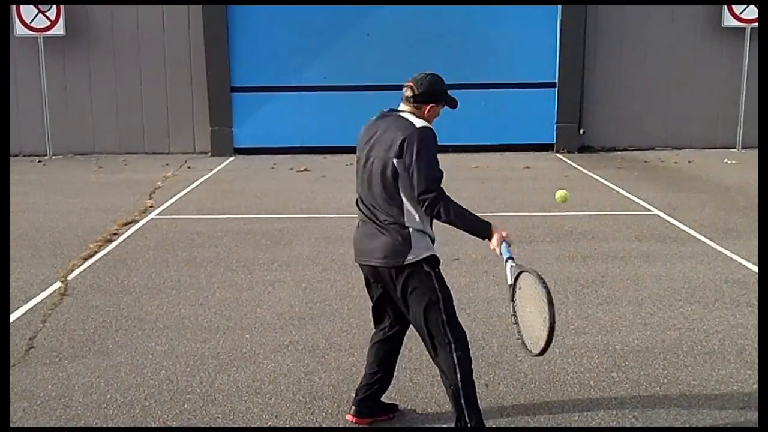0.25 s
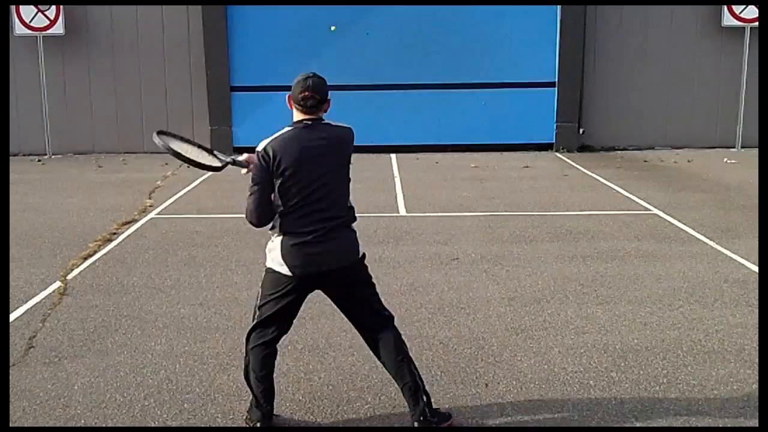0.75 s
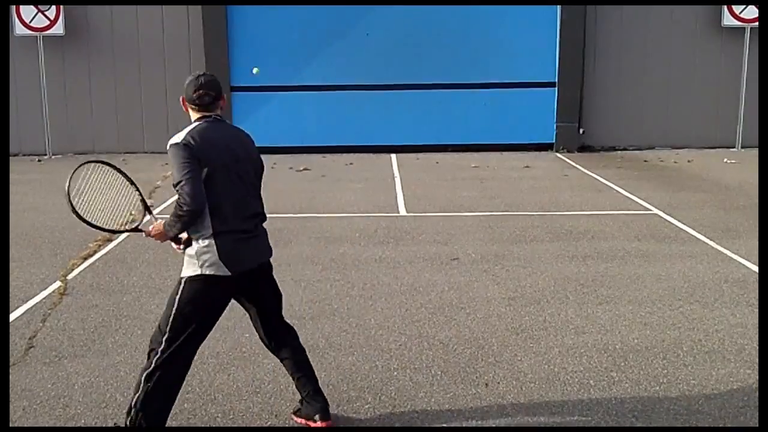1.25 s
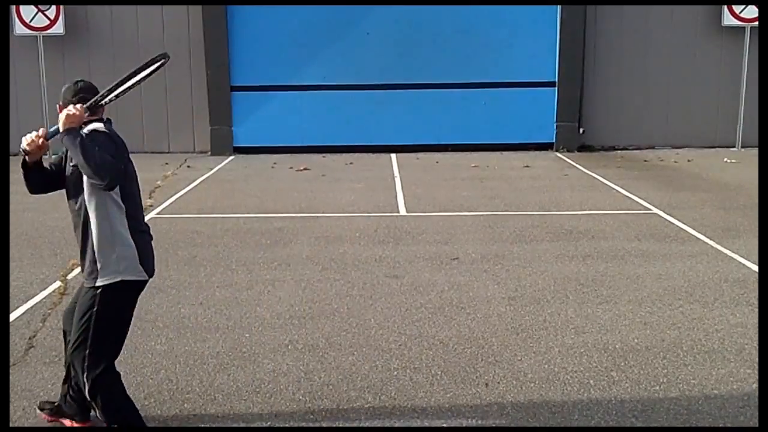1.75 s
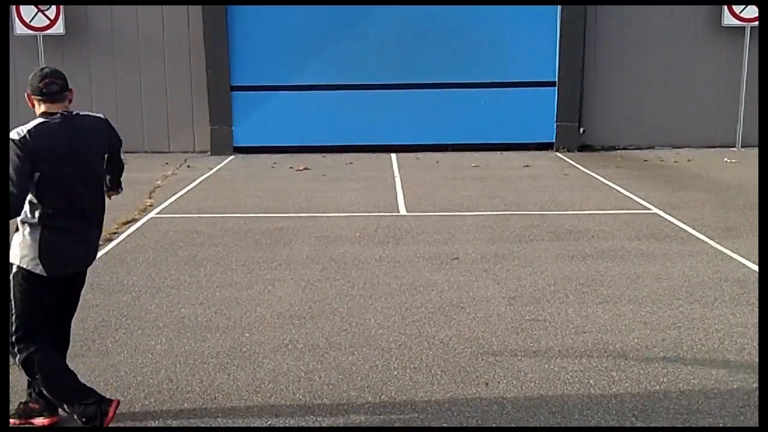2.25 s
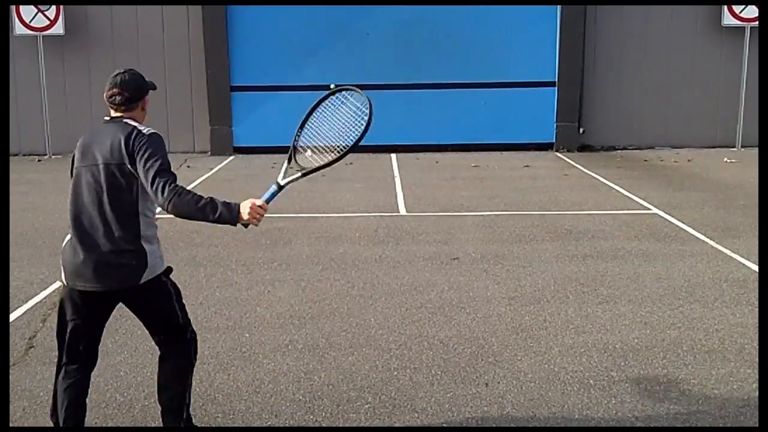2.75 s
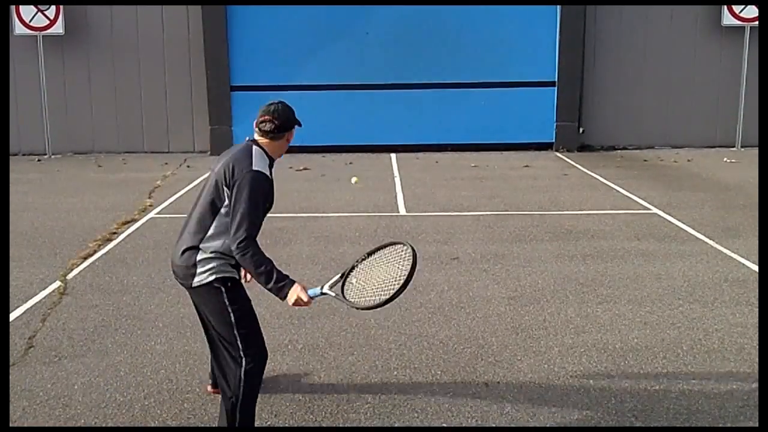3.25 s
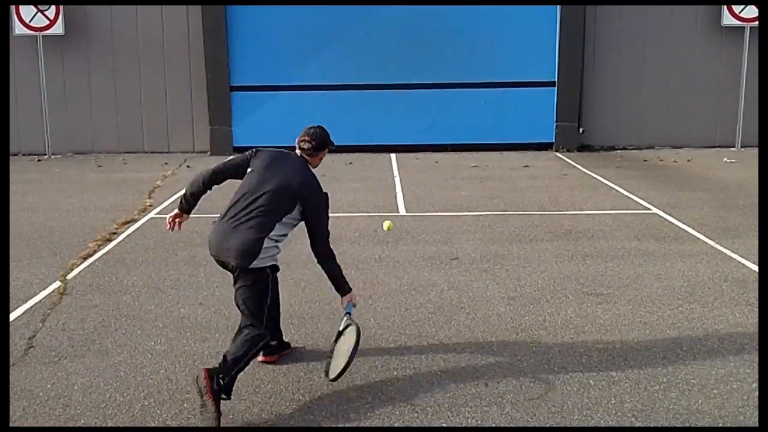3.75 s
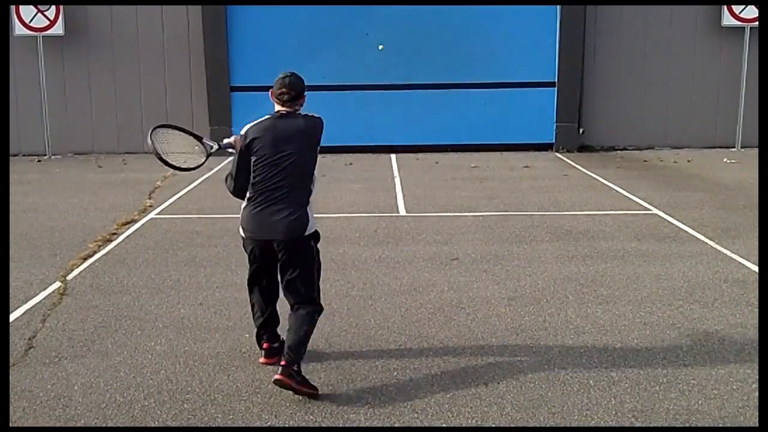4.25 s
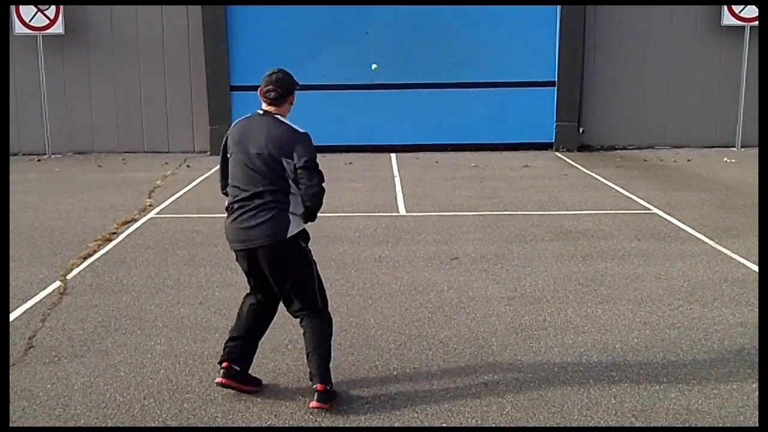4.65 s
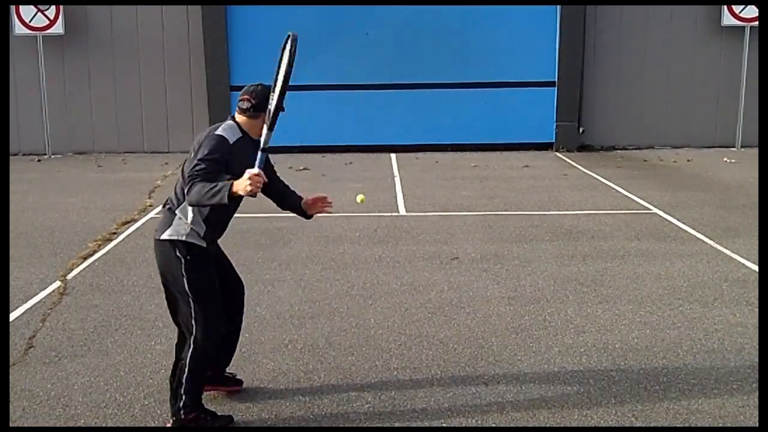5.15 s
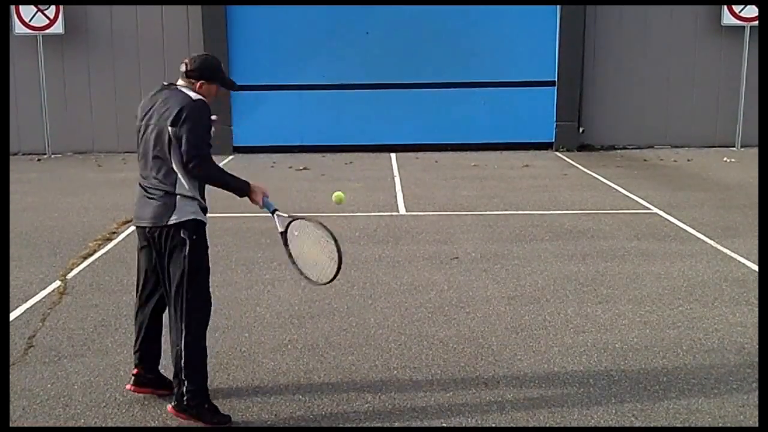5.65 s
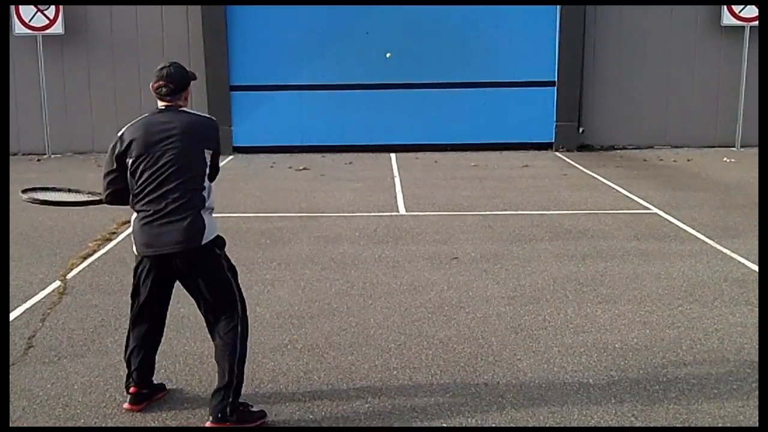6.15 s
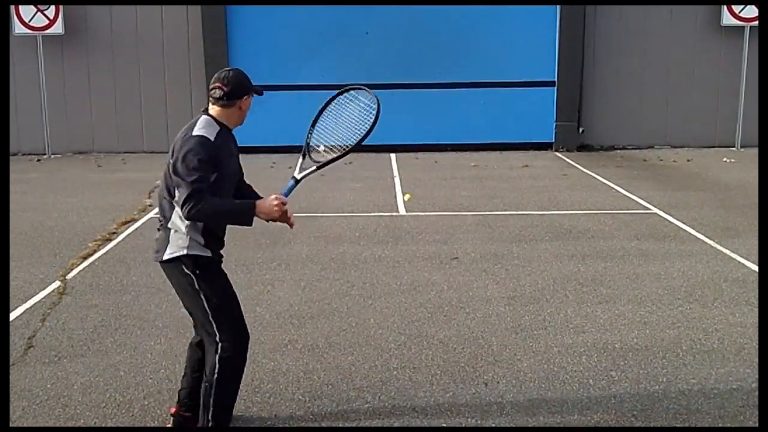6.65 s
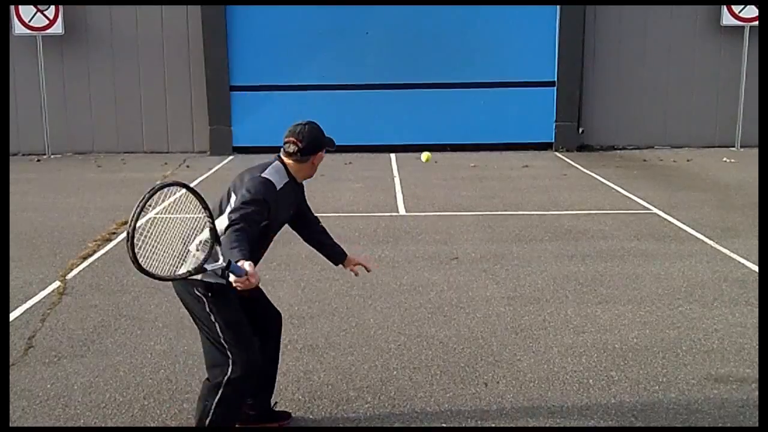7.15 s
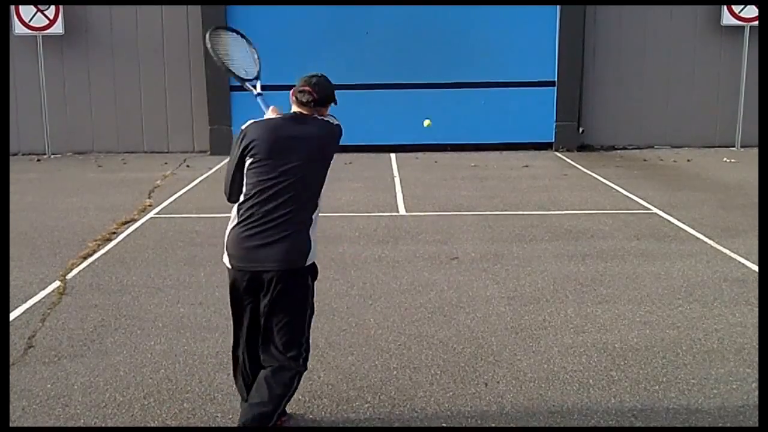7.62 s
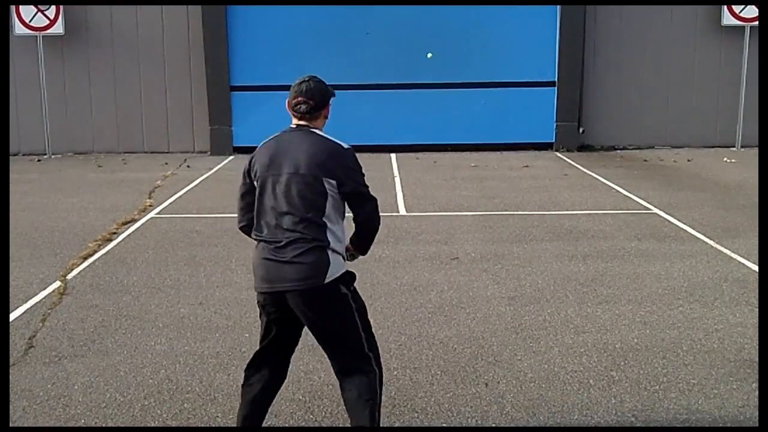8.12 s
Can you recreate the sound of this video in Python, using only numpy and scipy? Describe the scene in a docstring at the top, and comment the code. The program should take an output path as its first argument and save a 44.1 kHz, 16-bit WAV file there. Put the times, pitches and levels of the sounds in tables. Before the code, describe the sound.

A solo tennis rally against a practice wall on an open asphalt court, heard near the player. A rough, crackling wind buffet hits the microphone at 0.1-0.25 s. A soft racket pop at 0.5 brings a modest wall crack at 1.0 amid another gust, then a faint bounce at 1.8. A brighter stroke at 2.4 is answered by a loud crack and boom at 2.9, with wind thumping at 3.05 and a bounce at 3.35. Shoes tap and a sole drags gritty asphalt at 3.75-3.95 before a higher-pitched pop at 4.05; the wall cracks at 4.5. Footsteps cluster at 4.8, and a clear bounce comes at 5.2. Strong ringing pop at 5.9, loudest crack at 6.3, shoe knock at 6.75, bounce at 6.9. The last stroke at 7.7 precedes a sharp scuffing footfall at 8.0 and a final crack at 8.15, echoing away.

```python
"""A tennis racket rallies a ball against a practice wall on an outdoor asphalt court: noise slap, ringing pop.
The wall cracks, booms and rings in damped modes; the ball bounces back in short decaying tones.
Shoes knock in filtered pulses; random grains make scrapes; decaying noise echoes round the walls.
Gusts of coloured noise and single eddies buffet the microphone over faint outdoor noise."""
import sys
import numpy as np
from scipy import signal
from scipy.fft import rfft, irfft, next_fast_len
from scipy.io import wavfile
from scipy.ndimage import uniform_filter1d, map_coordinates

SR = 44100
rng = np.random.default_rng(int(sys.argv[2]) if len(sys.argv) > 2 else 0)


def master_out(mix):
    """Clip the mix to full scale and print it as 16-bit PCM to the path in sys.argv[1]."""
    frames = np.transpose(np.atleast_2d(mix))
    ceiling = np.clip(frames, -1, 1)
    pcm = np.round(ceiling * 32767).astype(np.int16)
    wavfile.write(sys.argv[1], SR, pcm)


N = 369773

# Event levels are relative: each layer adds its own offset in dB. Modal pitches vary slightly per blow.
# Racket strokes. Each row: start in seconds, slap level in dB, ball pop level in dB, pop pitch in Hz,
# frame thud level in dB, thud pitch in Hz, string level in dB, near-wall echo delay in seconds.
RACKET_STROKES = [(0.518, -27.5, -29.5, 890, -24.5, 416, -32, 0.059),
                  (2.43, -21, -22.5, 908, -24.5, 390, -25.5, 0.06),
                  (4.053, -19.5, -21, 1522, -17.5, 297, -26.5, 0.056),
                  (5.8849, -17, -14, 890, -24, 378, -25.5, .062),
                  (7.691, -18, -16, 880, -31.5, 300, -23.5, 0.061)]
# Ball on the wall. Each row: start in seconds, crack level in dB, panel level in dB.
WALL_BLOWS = [(1.0368, -17.5, -31.5), (2.8982, -5.5, -23), (4.521, -7, -25.5), (6.3277, -2.5, -22),
              (8.1573, -4, -22.5)]
# Ball on the asphalt. Each row: start in seconds, level in dB, pitch in Hz.
GROUND_BOUNCES = [(1.7848, -27, 1400), (3.3552, -22, 1274), (5.2296, -16.5, 1250), (6.9241, -22.5, 1176)]
# Footfalls. Each row: start in seconds, heel level in dB, pitch in Hz,
# loss per further contact in dB (negative: gain), grit level in dB.
FOOTFALLS = [(0.7805, -35, 1740, 14, -51), (.8335, -35.5, 2700, 12, -52), (1.946, -41, 2450, 14, -58),
             (2.043, -43, 2960, 12, -54), (2.1372, -25.5, 1500, 19, -65), (2.5765, -15, 1340, 22, -48),
             (3.5827, -29, 1600, 20, -59), (3.644, -23, 1570, 16, -48), (3.9564, -16.5, 2130, 6, -33),
             (4.778, -26.5, 2170, 4, -47), (4.7971, -16, 1570, 6, -46), (4.8277, -25, 2570, 25, -60),
             (5.1843, -21.5, 2280, 7, -29.5), (5.207, -23, 2500, 4.5, -29.5), (5.318, -32, 2040, 18, -45),
             (5.829, -36, 2250, -2, -41), (6.7622, -14.5, 1350, 42, -35.5),
             (7.558, -40.5, 2080, -2.5, -44.5), (7.9762, -11.5, 1840, 1.5, -21.5),
             (8.3176, -31, 1440, 11, -53)]
# Short bursts of scrape: soles sliding on grit, and strokes returned by the practice wall.
# Each row: middle in seconds, level in dB, quarter of the length in seconds.
SCRAPE_BURSTS = [(.687, -39, 0.02), (1.168, -39, .03), (3.195, -45, .011), (3.615, -47.5, 0.028),
                 (4.483, -38.5, 0.019), (5.266, -40.5, 0.043), (6.038, -39.5, .025), (6.738, -37.5, .022),
                 (7.265, -46, 0.023), (8.039, -42, 0.041)]
# Wind strength at the microphone. Each row: time in seconds, level in dB.
WIND_LEVEL = [(0, -40.5), (.1, -29.5), (.12, -11), (.185, -20), (.235, -12), (.255, -33.5), (.87, -31),
              (.95, -23), (1.05, -24.5), (1.32, -37.5), (1.4, -53), (1.61, -41.5), (1.72, -32), (1.94, -44),
              (2.16, -56.5), (2.35, -39), (2.86, -40.5), (3.05, -22), (3.49, -45), (3.61, -32.5),
              (3.85, -49.5), (4.08, -25), (4.36, -43), (4.5, -27), (4.9, -41), (5.02, -30), (5.6, -46.5),
              (5.8, -37.5), (6.13, -64), (6.7, -52), (7.01, -38), (7.2, -48), (7.54, -31), (7.84, -38.5),
              (7.91, -22.5), (8.12, -40), (8.38, -28.5)]
# Eddies striking the microphone. Each row: middle in seconds, level in dB, pitch in Hz.
WIND_EDDIES = [(.121, -5.5, 350), (.142, -12.5, 197), (.163, -11.5, 170), (.181, -15, 300),
               (.239, -9.5, 271), (0.9704, -12.5, 320), (0.975, -9.5, 136), (1.016, -16, 286),
               (1.752, -19.5, 109), (1.871, -22, 108), (2.013, -22, 99), (3.05, -9, 144),
               (3.076, -15.5, 242), (3.116, -20, 203), (3.138, -14.5, 165), (3.222, -22, 216),
               (4.167, -18.5, 144), (4.765, -14, 158), (4.822, -20, 128), (4.98, -17, 90), (6.82, -34, 100),
               (7.008, -23.5, 121), (7.32, -22.5, 101), (7.49, -22, 138), (7.666, -19, 132),
               (7.898, -17.5, 128)]
# Upper modes of squashed ball and frame. Each row: pitch in Hz, level in dB, T60 in seconds.
BALL_MODES = [(1150, 7, 0.03), (1787, -2, 0.085), (2130, -6.5, 0.082), (2820, -21.5, .025),
              (3830, -9, 0.061), (4600, -15, 0.014)]
# String bed modes. Each row: pitch in Hz, level in dB, T60 in seconds.
STRING_MODES = [(484, -1.5, 0.22), (628, -16, 0.69), (910, -11.5, 0.45), (1372, -2, 0.12),
                (1720, -2.5, 0.14), (2040, -12, 0.36), (2697, -6, 0.089), (4230, -26, 0.06)]
# Low modes of the wall panel. Each row: pitch in Hz, level in dB, T60 in seconds.
PANEL_LOW_MODES = [(120, -5, 0.25), (186, -5, 0.52), (244.5, 0, 0.2), (298, -0.5, 0.29), (464, -14, 0.45),
                   (489, -15, .3), (702, -2, 0.23), (874, 0, .2), (995, -3.5, 0.25), (1186, -5.5, 0.12),
                   (1570, -7, 0.091)]
# Spectrum of felt on strings and asphalt. Each row: frequency in Hz, relative density in dB per Hz.
SLAP_SPECTRUM = [(100, -13), (330, 4), (480, 1.5), (610, -2), (800, 5), (1100, 0.5), (1400, -2.5),
                 (2000, -2), (3000, -8.5), (4300, -11), (5500, -19), (8000, -30), (11000, -39.5),
                 (16000, -56)]
# Spectrum of the wall crack. Each row: frequency in Hz, relative density in dB per Hz.
CRACK_SPECTRUM = [(60, -20), (250, 9.5), (900, -2), (1800, 9.5), (3000, -1), (5000, -15.5), (8000, -32),
                  (16000, -33)]
# Spectrum of the panel's dense ringing. Each row: frequency in Hz, relative density in dB per Hz.
PANEL_SPECTRUM = [(40, -45), (100, 4.5), (230, 6.5), (380, -1.5), (700, -3), (1500, -5), (2400, -9.5),
                  (3500, -20.5), (5000, -25), (8000, -50), (16000, -52)]
# Decay of that ringing. Each row: frequency in Hz, T60 in seconds.
PANEL_DECAY = [(80, 1), (230, 0.56), (600, 0.53), (2000, 0.34), (5000, 0.16), (12000, 0.075)]
# Spectrum of the court's reverberation. Each row: frequency in Hz, relative density in dB per Hz.
COURT_SPECTRUM = [(80, -20), (250, 11), (500, 3), (900, 11.5), (1300, 3), (1520, 6.5), (1720, 9.5),
                  (2100, 4.5), (2700, 0), (4000, -11.5), (7000, -28), (16000, -44)]
# Decay of the court. Each row: frequency in Hz, T60 in seconds.
COURT_DECAY = [(100, 2), (1000, 0.97), (2500, 1.05), (5000, 1.05), (12000, .4)]
# Spectrum of the grainy scrapes. Each row: frequency in Hz, relative density in dB per Hz.
GRIT_SPECTRUM = [(150, -8.5), (600, 3.5), (1500, 7), (3000, -4), (6000, -9.5), (8000, -36), (16000, -39)]
# Spectrum of the dragged sole. Each row: frequency in Hz, relative density in dB per Hz.
SOLE_DRAG_SPECTRUM = [(200, -1), (600, 3.5), (1000, -0.5), (1900, 4), (3000, -6), (4500, -8.5),
                      (6500, -12.5), (8500, -26), (12000, -30), (16000, -34)]
# Spectrum of weak wind. Each row: frequency in Hz, relative density in dB per Hz.
WEAK_WIND_SPECTRUM = [(15, -24), (35, -3.5), (75, 1.5), (160, -6.5), (240, -13), (350, -25), (600, -39),
                      (1500, -67), (5000, -82)]
# Spectrum of strong wind. Each row: frequency in Hz, relative density in dB per Hz.
STRONG_WIND_SPECTRUM = [(20, -15), (90, -12.5), (170, -1), (290, -6.5), (450, -20), (700, -27), (1300, -55),
                        (4000, -81), (16000, -87)]
# Spectrum of distant outdoor noise. Each row: frequency in Hz, relative density in dB per Hz.
AIR_SPECTRUM = [(120, -32), (200, -10.5), (350, -8), (880, -9.5), (1650, -15), (2300, -20.5), (3800, -21.5),
                (4600, -31.5), (7000, -35.5), (8400, -37), (14000, -35.5), (16000, -41)]
# Level of distant outdoor noise: quieter at first, steady from 1.8 s.
# Each row: time in seconds, relative level in dB.
AIR_LEVEL = [(0, -7), (.9, -6), (1.8, 0)]

TIME_S = np.arange(N) / SR
AGE_S = np.arange(2 * SR) / SR  # time since a blow
TOP_HZ = 15900
WALL_ECHO_S, WALL_ECHO_DB = 0.13, -23  # racket sound back from the practice wall
# narrow ringing echo between the court walls after each stroke
FLUTTER_HZ, FLUTTER_S, FLUTTER_DB, FLUTTER_T60_S = 1840, 0.19, -47, 0.95
ROLL_S = 0.008  # between contacts of a landing sole
GRIT_QUARTER_S, GRIT_HZ = 0.012, 2370  # quarter length of a landing's crunch; centre of the scrape band
# a sole dragged through a lunge; it grips and slips in rasps RASP_S apart
DRAG_START_S, DRAG_END_S, DRAG_DB, DRAG_EDGE_DB_PER_S = 3.745, 3.96, -43.5, 450
RASP_S, RASP_DB = 0.085, 2
# eddies at OVERLOAD_DB or more crackle fully; weaker ones lose CRACKLE_SLOPE dB per dB
OVERLOAD_DB, CRACKLE_DB, CRACKLE_SLOPE = -11.5, -27, 6.3


def amp(db):
    """Decibels to gain."""
    return 10 ** (np.asarray(db) / 20)


def unit(x):
    """x at rms 1."""
    return x / np.sqrt(np.mean(x ** 2) + 1e-20)


def along(points, hz):
    """(Hz, value) points interpolated on a log-frequency axis."""
    point_hz, values = np.transpose(points)
    return np.interp(np.log(hz + 1), np.log(point_hz), values)


def fade(t_s, t60_s):
    """Exponential decay, 60 dB per T60."""
    return np.exp(-np.log(1000) * t_s / t60_s)


def add(track, start_s, sound):
    """Mix a sound into the track."""
    start = max(round(start_s * SR), 0)
    track[start:start + len(sound)] += sound[:max(N - start, 0)]


def noise(spectrum, size):
    """Coloured noise of rms 1."""
    fft_size = next_fast_len(size)
    hz = np.fft.rfftfreq(fft_size, 1 / SR)
    white = rfft(rng.standard_normal(fft_size))
    return unit(irfft(white * amp(along(spectrum, hz)), fft_size)[:size])


def click(spectrum, size=1024):
    """Causal minimum-phase pulse of peak 1 with this spectrum."""
    gain = amp(along(spectrum, np.fft.rfftfreq(size, 1 / SR)))
    cepstrum = irfft(np.log(gain))
    cepstrum[1:size // 2] *= 2
    cepstrum[size // 2 + 1:] = 0
    pulse = irfft(np.exp(rfft(cepstrum)))
    return pulse / np.abs(pulse).max()


def tail(spectrum, decay):
    """Dense ringing: noise of rms 1 before each frequency decays at its own T60."""
    hz, t_s, bins = signal.stft(noise(spectrum, len(AGE_S)), SR, nperseg=256)
    t60_s = along(decay, hz)[:, None]
    return signal.istft(bins * fade(t_s, t60_s), SR)[1][:len(AGE_S)]


def ring(modes, swell_s, size=16384):
    """Damped modes with a soft onset; tuning and mode levels vary per blow."""
    t_s = AGE_S[:size]
    tuning = 1 + rng.normal(0, 0.005)
    waves = np.zeros(size)
    for hz, db, t60_s in modes:
        level = amp(db + rng.normal())
        waves += level * fade(t_s, t60_s) * np.sin(2 * np.pi * hz * tuning * t_s)
    onset = 1 - np.exp(-(t_s / swell_s) ** 2)
    return waves * onset * np.linspace(1, 0, size)


def band(x, hz, spread, order=2):
    """Band-pass centred on hz, edges a factor 1 + spread away."""
    edges_hz = [hz / (1 + spread), min(hz * (1 + spread), SR / 2 - 1)]
    return signal.sosfilt(signal.butter(order, edges_hz, "band", fs=SR, output="sos"), x)


def wobble(rate_hz):
    """Smooth random curve, rate_hz knots a second."""
    knots = rng.standard_normal(int(N * rate_hz / SR) + 4)
    return map_coordinates(knots, [TIME_S * rate_hz])


def racket():
    """Felt slaps strings for a few ms, the hollow ball pops off, strings ring on; walls echo the stroke."""
    out, t_s = np.zeros(N), AGE_S[:SR // 4]
    contact = np.exp(-((t_s - 0.0036) / 0.004) ** 2)
    for start_s, slap_db, pop_db, pop_hz, thud_db, thud_hz, strings_db, delay_s in RACKET_STROKES:
        stroke = np.zeros(SR // 2)
        add(stroke, 0, amp(slap_db + 3.5) * contact * noise(SLAP_SPECTRUM, len(t_s)))
        add(stroke, 0.004, amp(slap_db - 11) * fade(t_s, 0.13) * noise(SLAP_SPECTRUM, len(t_s)))
        add(stroke, 0.002, amp(pop_db + 14) * ring([(pop_hz, 0, 0.03)], swell_s=0.0016))
        add(stroke, 0.002, amp(slap_db - 3) * ring(BALL_MODES, swell_s=0.0018))
        add(stroke, 0.001, amp(thud_db + 15.5) * ring([(thud_hz, 0, 0.02)], swell_s=0.0017))
        add(stroke, 0.003, amp(strings_db) * ring(STRING_MODES, swell_s=0.0015))
        add(out, start_s, stroke)
        # nearby wall
        near_s = start_s + delay_s
        near_modes = [(996, -0.5, 0.024), (1270, -0.5, 0.01)]
        add(out, near_s, amp(-18) * band(stroke, 610, spread=2.5, order=1))
        add(out, near_s + 0.00283, amp(slap_db + 3) * ring(near_modes, swell_s=0.00057))
        add(out, near_s + 0.003, amp(slap_db - 16.5) * tail(SLAP_SPECTRUM, PANEL_DECAY))
        # practice wall
        add(out, start_s + WALL_ECHO_S, amp(WALL_ECHO_DB) * band(stroke, 2000, spread=1, order=1))
        # diffuse return from far away, then flutter
        far = tail(COURT_SPECTRUM, COURT_DECAY) * (1 - fade(AGE_S, 0.055))
        add(out, start_s + 0.15, amp(slap_db - 22) * far)
        flutter = unit(band(rng.standard_normal(len(AGE_S)), FLUTTER_HZ, spread=0.13))
        flutter *= fade(AGE_S, FLUTTER_T60_S) * (1 - fade(AGE_S, 0.18))
        add(out, start_s + FLUTTER_S, amp(FLUTTER_DB) * flutter)
    return out


def wall():
    """Sharp crack with its copy off the ground, the ball's pock, the panel's boom, a chirping echo."""
    out, crack = np.zeros(N), click(CRACK_SPECTRUM)
    pock_modes = [(576, 0.5, 0.02), (957, 4, 0.01), (1260, 11.5, 0.0068)]
    for start_s, crack_db, panel_db in WALL_BLOWS:
        add(out, start_s, -amp(crack_db + 2.5) * crack)
        add(out, start_s + 0.001374, -amp(crack_db - 5) * crack)
        add(out, start_s + 0.00105, amp(panel_db + 17.5) * ring(pock_modes, swell_s=0.0014))
        boom = tail(PANEL_SPECTRUM, PANEL_DECAY) * (1 - fade(AGE_S, 0.0046))
        add(out, start_s + 0.001037, amp(panel_db + 4.5) * boom)
        low_ring = ring(PANEL_LOW_MODES, swell_s=0.002, size=len(AGE_S))
        add(out, start_s + 0.002, amp(panel_db - 3) * low_ring)
        add(out, start_s + 0.038, amp(panel_db - 7.5) * tail(PANEL_SPECTRUM, PANEL_DECAY))
        court = tail(COURT_SPECTRUM, COURT_DECAY) * (1 - fade(AGE_S, 0.13))
        add(out, start_s + 0.02, amp(panel_db - 14) * court)
        # the echo falls in pitch and leaves a brief sizzle
        echo_s = start_s + 0.088
        add(out, echo_s, amp(panel_db + 9) * chirp(high_hz=3830, low_hz=590, length_s=0.00332))
        sizzle = unit(band(rng.standard_normal(len(AGE_S)), 2370, spread=0.24))
        add(out, echo_s, amp(panel_db - 9.5) * sizzle * fade(AGE_S, 0.085))
    return out


def chirp(high_hz, low_hz, length_s):
    """A few cycles falling in pitch, loudest in the middle."""
    u = np.arange(0, 1, 1 / (length_s * SR))
    pitch_hz = high_hz + (low_hz - high_hz) * u
    return np.sin(np.pi * u) ** 2 * np.sin(2 * np.pi * np.cumsum(pitch_hz) / SR)


def bounces():
    """Ball shell rings a few cycles on hard ground, a weak copy just behind; felt scuffs the asphalt."""
    out, t_s = np.zeros(N), AGE_S[:SR // 50]
    squash = np.exp(-((t_s - 0.001) / 0.0012) ** 2) + amp(-17) * fade(t_s, 0.02)
    thud_swell = np.exp(-((t_s - 0.0012) / 0.0012) ** 2)
    for start_s, db, hz in GROUND_BOUNCES:
        shell = squash * np.sin(2 * np.pi * hz * t_s)
        thud = amp(-11) * thud_swell * np.sin(np.pi * hz * t_s)  # an octave below
        pock = -amp(db) * (shell + thud)
        add(out, start_s, pock)
        add(out, start_s + 0.00409, amp(-14.5) * pock)
        add(out, start_s, amp(db - 14) * fade(t_s, 0.025) * noise(SLAP_SPECTRUM, len(t_s)))
    return out


def footfalls(count=3):
    """A foot lands heel first and rolls down in further knocks; the landing sole crushes grit."""
    out = np.zeros(N)
    for start_s, db, hz, loss_db, grit_db in FOOTFALLS:
        for k in range(count):
            add(out, start_s + k * ROLL_S, amp(db - k * loss_db) * knock(hz))
        add(out, start_s - 2 * GRIT_QUARTER_S, amp(grit_db) * crunch(GRIT_QUARTER_S))
    # loose grit: about 20 faint ticks a second throughout
    ticks = (rng.random(N) < 20 / SR) * rng.random(N)
    return out + amp(-26.5) * band(ticks, 2500, spread=0.76, order=3)


def knock(hz):
    """One shoe contact with the asphalt: band-passed impulse and noise, peak 1."""
    t_s = AGE_S[:SR // 20]
    rough = rng.standard_normal(len(t_s)) * fade(t_s, 0.014)
    blow = signal.unit_impulse(len(t_s)) + amp(-20) * rough
    octave = band(blow, 2 * hz, spread=0.39, order=3)
    sound = band(blow, hz, spread=0.7, order=3) + amp(-22) * octave
    return sound / np.abs(sound).max()


def scrape_bursts():
    """Short grainy scrapes: soles sliding on grit, and strokes returned by the practice wall."""
    out = np.zeros(N)
    for middle_s, db, quarter_s in SCRAPE_BURSTS:
        add(out, middle_s - 2 * quarter_s, amp(db) * crunch(quarter_s))
    return out


def crunch(quarter_s):
    """Scrape of random grains that swells and dies over four quarters, rms 1 before the swell."""
    u = np.arange(-2, 2, 1 / (quarter_s * SR))
    # 1400 grains a second on average, a few much larger than the rest
    hits = rng.random(len(u)) < 1400 / SR
    sizes = amp(8 * rng.normal(size=len(u)).clip(-2, 2))
    grains = hits * rng.choice([-1, 1], len(u)) * sizes
    crushed = np.convolve(grains, click(GRIT_SPECTRUM))[:len(u)]
    scrape = unit(band(crushed, GRIT_HZ, spread=0.54)) + amp(-1.5) * unit(crushed)
    return unit(scrape) * np.exp(-2 * u ** 2)


def drag():
    """Long, broad scrape: fine grit rolls under the sole in uneven bursts of noise."""
    outside_s = np.abs(TIME_S - np.clip(TIME_S, DRAG_START_S, DRAG_END_S))
    rasps_db = RASP_DB * np.cos(2 * np.pi * (TIME_S - DRAG_START_S) / RASP_S)
    grip_db = 3.5 * wobble(900) + 2.5 * wobble(110)
    scrape = unit(amp(grip_db) * noise(SOLE_DRAG_SPECTRUM, N))
    return amp(DRAG_DB + rasps_db - DRAG_EDGE_DB_PER_S * outside_s) * scrape


def wind():
    """Eddies rumble on the microphone; strong gusts shift the rumble up, strong eddies also crackle."""
    level_db = np.interp(TIME_S, *np.transpose(WIND_LEVEL))
    force = np.clip((level_db + 27) / 12, 0, 1)
    weak = np.sqrt(1 - force) * noise(WEAK_WIND_SPECTRUM, N)
    strong = np.sqrt(force) * noise(STRONG_WIND_SPECTRUM, N)
    flow = weak + strong
    # even out the power over about 40 ms, so the gust sets the strength
    flow /= np.sqrt(np.abs(uniform_filter1d(flow ** 2, size=1800)) + 0.15)
    lumps_db = 2.5 * wobble(55) + 2 * wobble(20)
    out = amp(level_db - 1.5 + lumps_db) * flow
    crackle = click([(300, 9.5), (1500, 4.5), (4000, -9), (9000, -17), (16000, -19)])  # Hz, dB
    for middle_s, db, hz in WIND_EDDIES:
        cycles = np.arange(-3, 3, hz / SR)
        eddy = np.sin(2 * np.pi * cycles) * np.exp(-(cycles / 0.85) ** 2)
        add(out, middle_s - 3 / hz, -amp(db) * eddy)
        crackle_db = CRACKLE_DB - CRACKLE_SLOPE * max(OVERLOAD_DB - db, 0)
        add(out, middle_s, amp(crackle_db) * crackle)
    return out


def court_echo(near):
    """The court's answer to the small sounds: convolution with decaying noise of unit energy."""
    answer = tail(COURT_SPECTRUM, COURT_DECAY)
    return amp(-23.5) * signal.fftconvolve(near, answer / np.linalg.norm(answer))[:N]


def distant_air():
    """Distant outdoor noise: coloured noise, quieter at first, with a slow drift in level."""
    drift_db = 0.5 * wobble(3)
    level_db = np.interp(TIME_S, *np.transpose(AIR_LEVEL))
    return amp(-55 + drift_db + level_db) * noise(AIR_SPECTRUM, N)


def scene():
    """Mix of the rally, shoes, scrapes, court echo, wind and distant air, one channel."""
    near = bounces() + footfalls() + scrape_bursts() + drag()
    return (racket() + wall() + near + court_echo(near) + wind() + distant_air())[None]


def record(dry):
    """Soft limit of the highest peaks towards 0.8, then nothing from TOP_HZ up."""
    rounded = dry / (1 + np.abs(dry / 0.8) ** 6) ** (1 / 6)
    size = next_fast_len(N + SR // 2)
    keep = np.fft.rfftfreq(size, 1 / SR) < TOP_HZ
    return irfft(rfft(rounded, size) * keep, size)[..., :N]


dry = scene()
out = record(dry)
master_out(out)
```